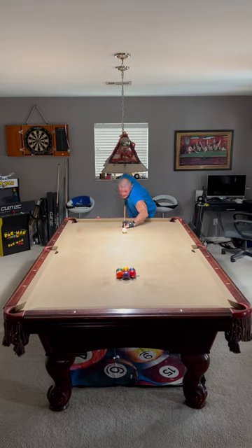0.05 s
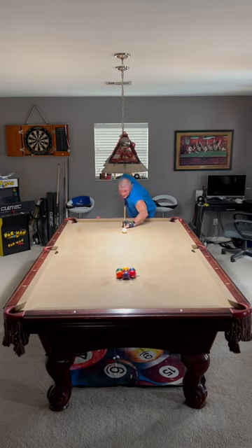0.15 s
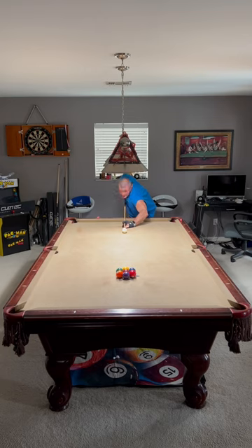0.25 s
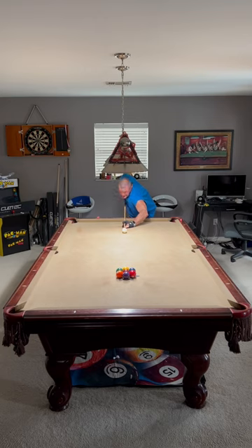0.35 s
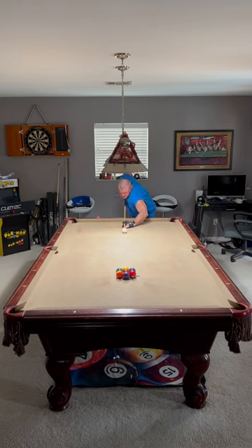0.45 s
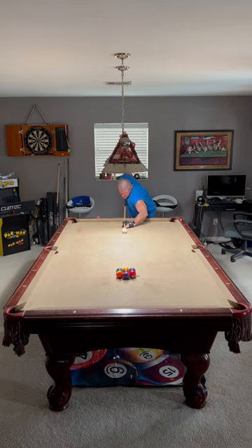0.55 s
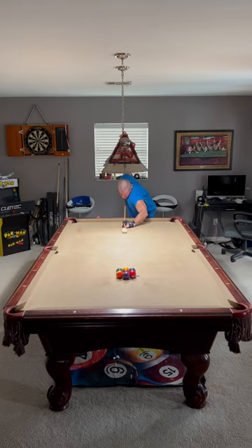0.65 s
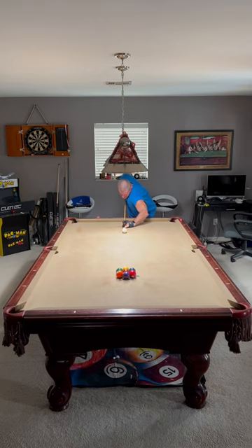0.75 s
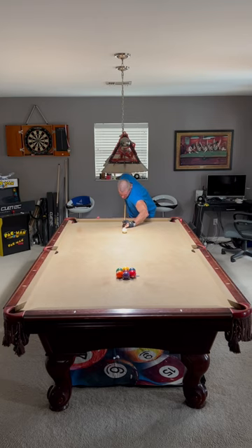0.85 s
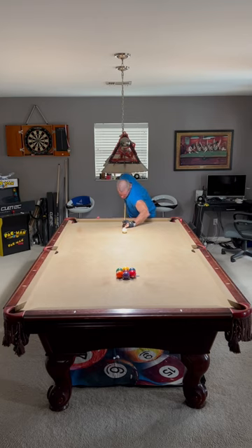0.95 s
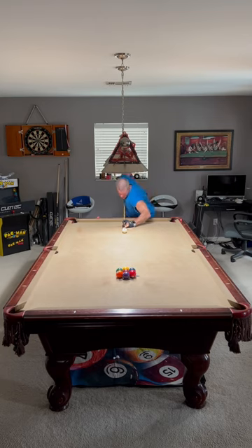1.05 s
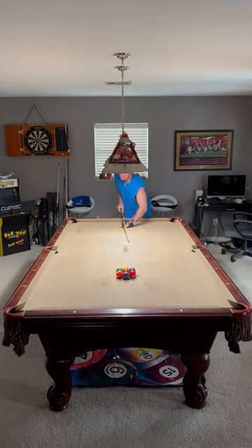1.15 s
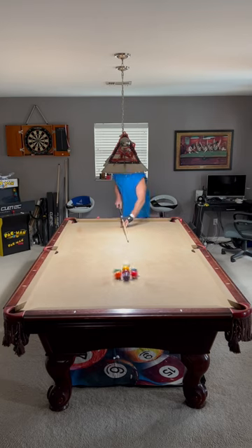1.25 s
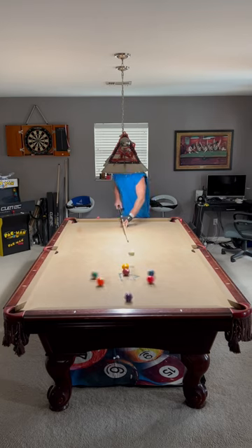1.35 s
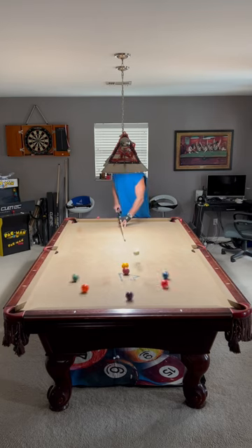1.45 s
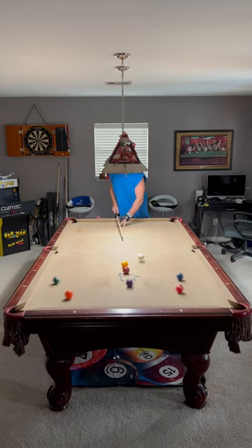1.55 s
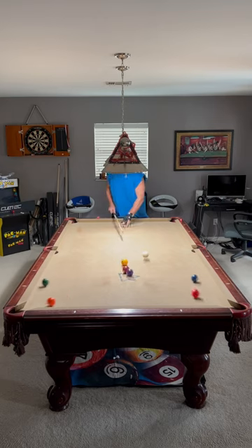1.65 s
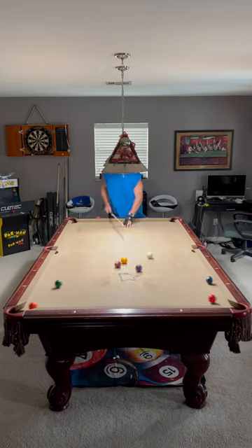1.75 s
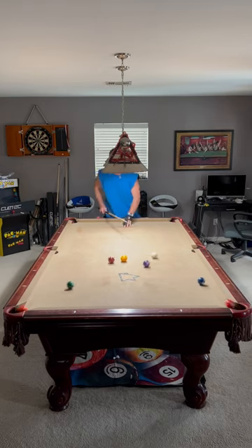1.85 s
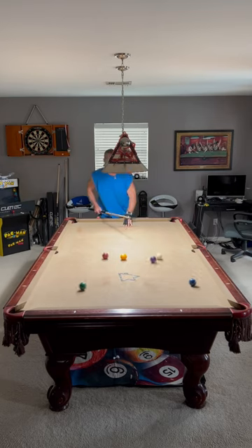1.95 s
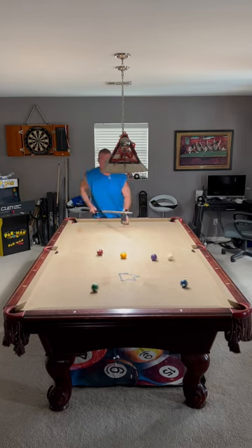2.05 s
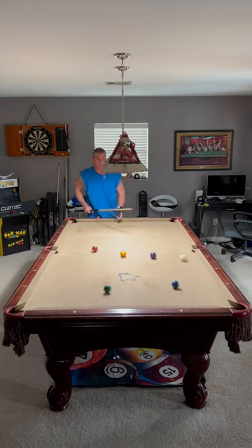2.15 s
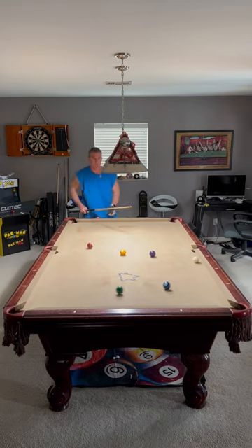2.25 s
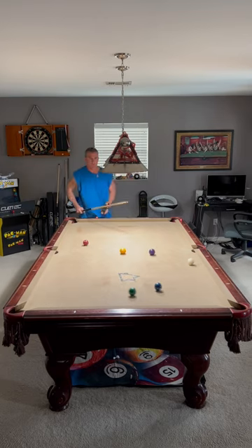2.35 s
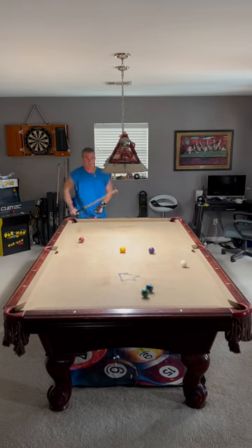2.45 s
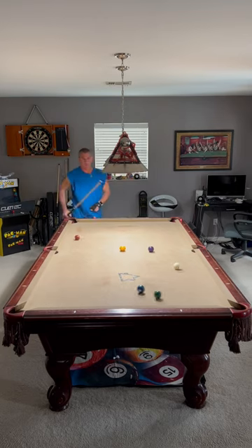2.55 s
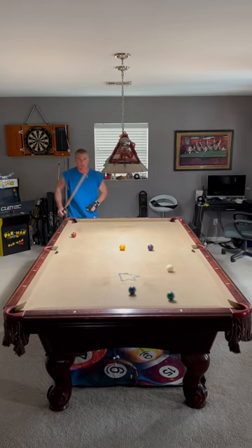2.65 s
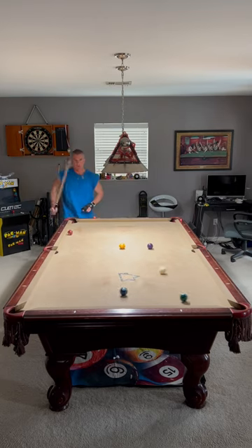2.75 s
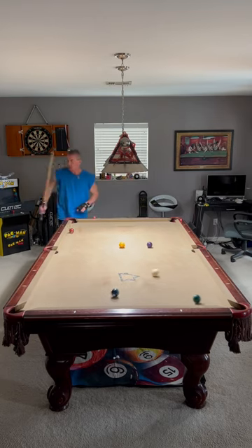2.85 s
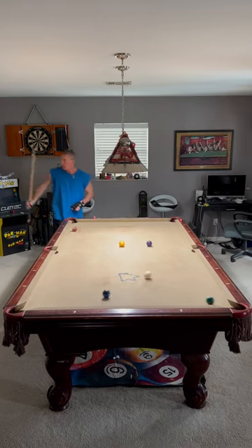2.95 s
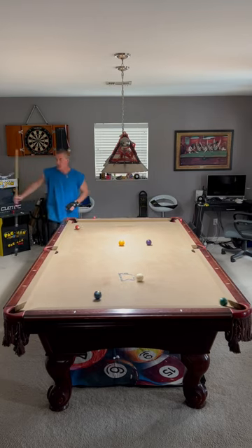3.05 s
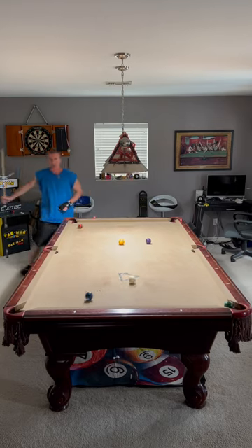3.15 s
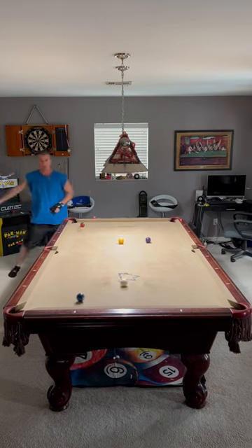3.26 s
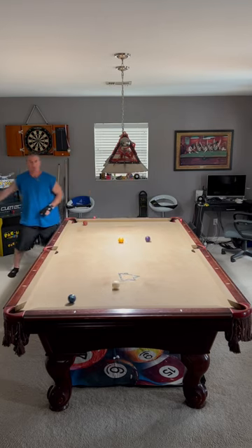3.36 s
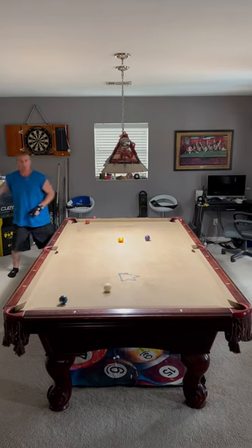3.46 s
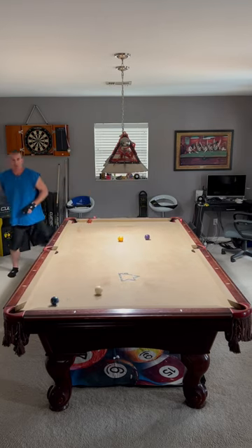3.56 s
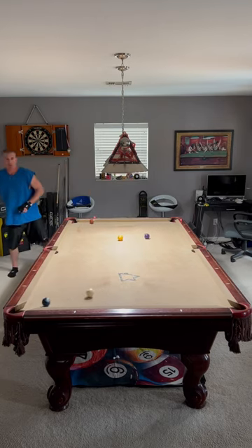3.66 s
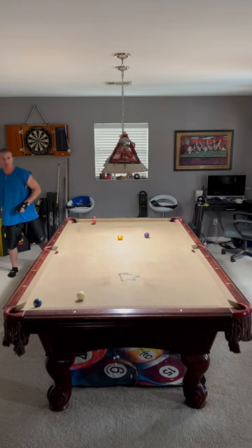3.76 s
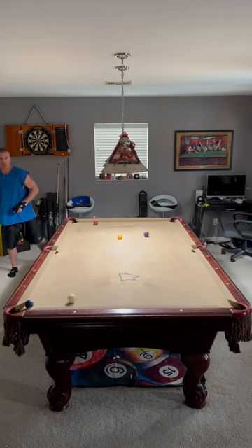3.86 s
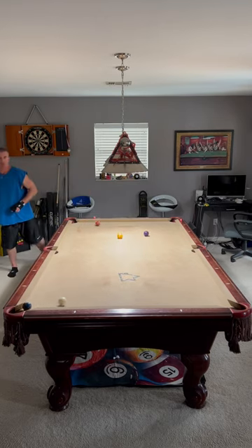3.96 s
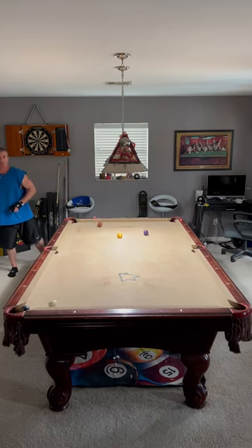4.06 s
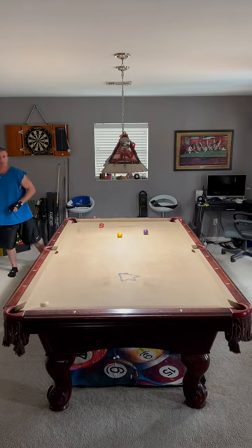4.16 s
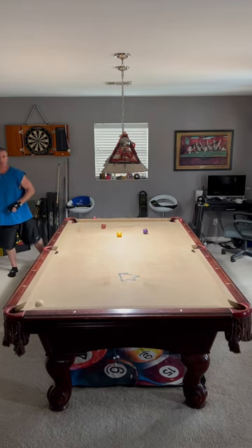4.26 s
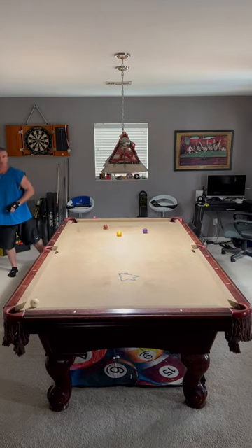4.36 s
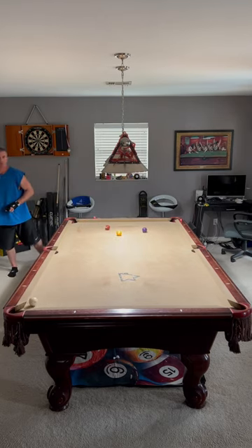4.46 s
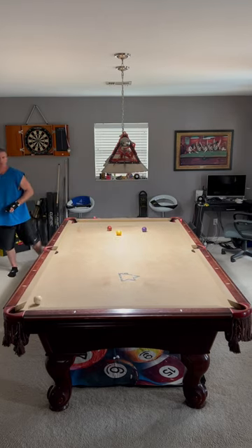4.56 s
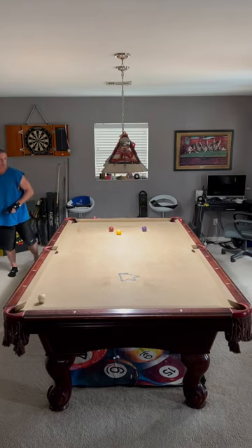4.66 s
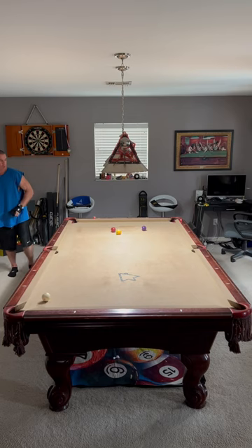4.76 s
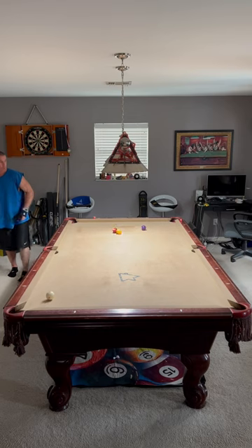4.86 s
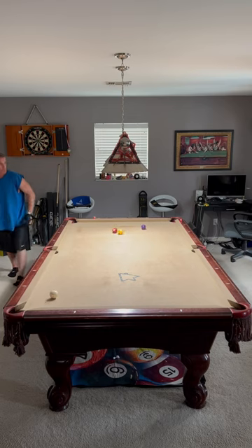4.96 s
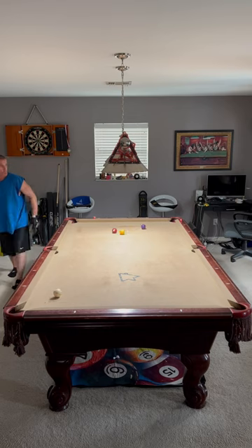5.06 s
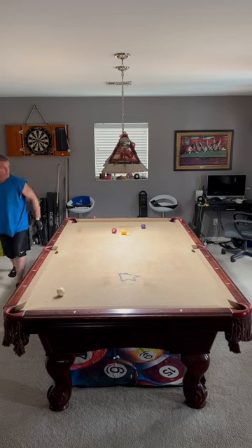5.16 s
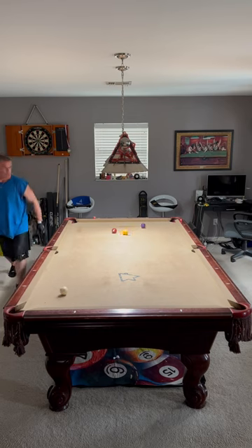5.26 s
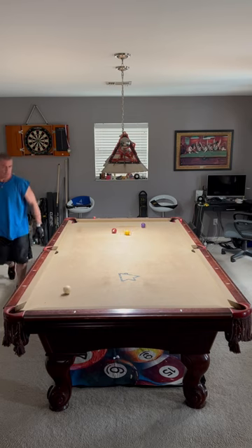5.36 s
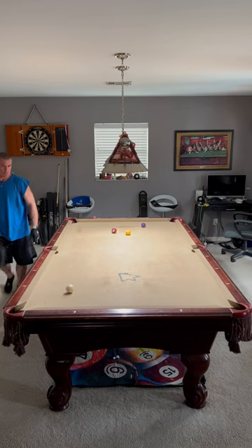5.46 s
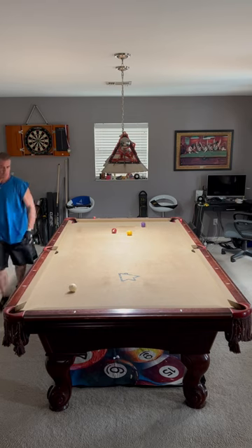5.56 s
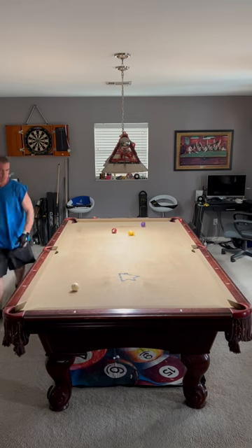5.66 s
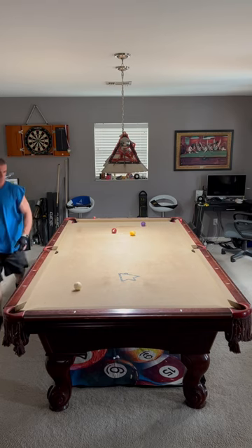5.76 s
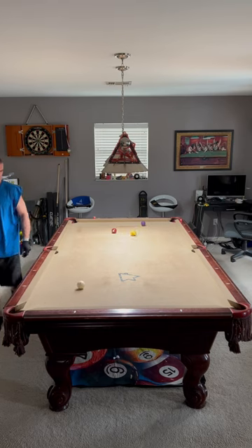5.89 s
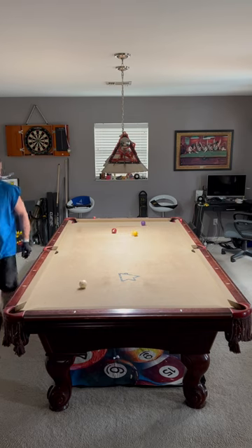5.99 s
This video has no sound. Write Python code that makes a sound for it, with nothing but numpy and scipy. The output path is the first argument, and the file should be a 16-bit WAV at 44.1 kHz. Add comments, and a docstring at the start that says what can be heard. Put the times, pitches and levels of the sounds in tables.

```python
"""A break shot on a slate pool table in a carpeted game room, heard from the foot of the table:
pulses of a few cycles make the cue's knock, the hard clacks and the thuds of cushions and pockets.
Random grains make the shaft's crackle and a ball tumbling into a pocket net; shaped noise makes
the low rumble with footfalls, the mid-range rush, the rustle, a faint hiss and the house rumble.
Noise that decays band by band rings after the blows, and a limiter holds the loudest peaks."""
import sys
import numpy as np
from scipy import signal
from scipy.fft import rfft, irfft
from scipy.io import wavfile
from scipy.ndimage import uniform_filter1d, minimum_filter1d

SR = 44100
rng = np.random.default_rng(int(sys.argv[2]) if len(sys.argv) > 2 else 0)


def unload_wav(signal):
    """Save mono or channel-first audio to the path in sys.argv[1] as 16-bit WAV at rate SR, clipped to [-1, 1]."""
    wavfile.write(
        sys.argv[1],
        SR,
        np.round(np.clip(np.atleast_2d(signal).T, -1, 1) * 32767).astype(np.int16),
    )


N = 265878
T = np.arange(N) / SR


def amp(db):
    """Level law: decibels to amplitude gain."""
    return 10 ** (np.asarray(db) / 20)


def rms_one(x):
    """Power normalisation: scale to rms 1."""
    return x / np.sqrt(np.mean(x ** 2) + 1e-20)


def in_time(rows):
    """Level envelopes: interpolate each column in time, -200 dB outside the table's span."""
    s, *columns = np.transpose(rows)
    return [np.interp(T, s, column, -200, -200) for column in columns]


def at_hz(points, hz):
    """Logarithmic frequency scale: interpolate a table along log f."""
    table_hz, values = np.array(points).T
    return np.interp(np.log(hz), np.log(table_hz), values)


def colour(x, spectrum):
    """Spectral filtering: weight each frequency by a gain curve in dB."""
    n = x.shape[-1]
    hz = np.arange(n // 2 + 1) * SR / n + 1   # 1 Hz up, to keep the logarithm finite
    return irfft(rfft(x) * amp(at_hz(spectrum, hz)), n)


# likeness of left and right in diffuse noise: (f/Hz, correlation)
NOISE_LIKENESS = [(60, 1), (250, 0.73), (600, .3), (1200, 0.01), (8000, 0.01), (13000, 0.17)]


def stereo_noise(size, likeness=NOISE_LIKENESS):
    """Interaural coherence: white noise whose left-right correlation follows frequency."""
    mid, side = rfft(rng.standard_normal((2, size)))
    alike = np.clip(at_hz(likeness, np.arange(len(mid)) * SR / size + 1), -1, 1)
    return irfft(np.sqrt(1 + alike) * mid + np.sqrt(1 - alike) * side * [[1], [-1]], size)


def sides(pan_db):
    """Level difference panning: left and right gains, left louder if positive."""
    return amp(np.array([[pan_db / 2], [-pan_db / 2]]))


def pulse(hz, cycles):
    """Impulsive radiation: a sudden push gives a few cycles that swell fast and die; peak 1."""
    turns = np.arange(int(4 * cycles * SR / hz)) * hz / SR
    swing = np.sin(2 * np.pi * turns) * turns ** 2 * np.exp(-6 * turns / cycles)
    window = np.hanning(len(turns))
    swing -= swing.sum() * window / window.sum()   # no net push
    return swing / np.abs(swing).max()


def add(track, s, sound):
    """Superposition: sum a sound into a track at a time in seconds."""
    i = round(s * SR)
    track[..., i:i + sound.shape[-1]] += sound[..., :track.shape[-1] - i]


def scatter(noise, decay_ms):
    """Diffuse scattering: a first arrival and a few ms of dying noise, unit energy."""
    t_ms = np.arange(len(noise)) * 1000 / SR
    spread = noise * np.exp(-t_ms / max(decay_ms, .02)) * 0.2
    spread[0] = 1
    return spread / np.sqrt(np.sum(spread ** 2))


def swell(s, attack_s, hold_s, release_db_per_s):
    """Exponential decay: gain rises as a square, holds, then falls evenly in dB."""
    rise = np.clip((T - s) / max(attack_s, .001), 0, 1)
    return rise ** 2 * amp(-release_db_per_s * np.maximum(T - s - attack_s - hold_s, 0))


def grains(per_s, spread_db):
    """Poisson-like impacts: random clicks of uneven size and sign, rms 1."""
    sizes = amp(spread_db * np.minimum(rng.exponential(1, N), 4)) * rng.choice([-1, 1], N)
    return rms_one(sizes * (rng.random(N) < per_s / SR))


# early echoes from table, ceiling and wall: (left t/ms, right t/ms, level/dB, smear/ms)
ROOM_ECHOES = [(1.5, 2.4, -6.5, 2.2), (7.8, 9.4, -10, 1.8), (15.2, 14.8, -11, 1.5)]
# late reverberation time: (f/Hz, t60/s)
ROOM_DECAY = [(100, .5), (260, 0.75), (700, 0.61), (1840, 0.58), (4850, .55), (12800, .45), (15500, 0.75)]
# likeness of left and right in the tail: (f/Hz, correlation)
TAIL_LIKENESS = [(60, 0.89), (250, -0.22), (500, .5), (1000, 0.32), (2000, 0.056), (4000, 0.36),
                 (8000, -0.49), (13000, 0.69)]
ROOM_DB, ROOM_FILLS_S = -29, .014
EARLY_DB, EARLY_T60_S = 7.5, 0.091   # an added faster decay, relative to the late tail


def room():
    """Reverberation: discrete echoes, then a tail that fills in and dies band by band, faster at first."""
    size = SR
    t, out = np.arange(size) / SR, np.zeros((2, size))
    noise = stereo_noise(size, TAIL_LIKENESS)
    edges = 40 * 2 ** np.arange(0, 9.1, .5)   # half octaves
    for low, high in zip(edges, edges[1:]):
        band = signal.sosfilt(signal.butter(2, [low, high], "band", fs=SR, output="sos"), noise)
        out += band * amp(-60 * t / at_hz(ROOM_DECAY, np.sqrt(low * high)))
    fill = 1 - np.exp(-(t / ROOM_FILLS_S) ** 2)
    early = 1 + amp(EARLY_DB - 60 * t / EARLY_T60_S)
    out *= amp(ROOM_DB) * fill * early
    for left_ms, right_ms, level_db, smear_ms in ROOM_ECHOES:
        scattered = amp(level_db) * scatter(rng.standard_normal(1024), smear_ms)   # furniture breaks each echo up
        add(out[0], left_ms / 1000, scattered)
        add(out[1], right_ms / 1000, scattered)
    return out


def heard(dry, wet):
    """Convolution: direct sound plus the room's answer to the wet signal."""
    return dry + signal.fftconvolve(wet[None], room(), axes=1)[:, :N]


FLIGHT_S = .0008   # delay of the direct sound
BED_DB = -28.5   # low pulse of the bed under the ball, relative to the blow
# the far wall sends each blow back lower and smeared, and the treble of clacks duller
WALL_PITCH, WALL_TREBLE_DB, WALL_SCATTER_MS = 0.85, -5, 3.1
WALL_SPREAD = 1.1   # strength of the smear against the first return
EDGE_MS, EDGE_SPREAD = 4.0, 6.0   # break-up of the treble that feeds the room
TABLE_PAN_DB = 0.5


def blows(rows, scatter_ms, first, second, airborne):
    """Impact and reflection: a pulse, its far-wall return, and two treble ticks or low swings per row."""
    dry, wet = np.zeros((2, N)), np.zeros(N)
    noise = rng.standard_normal((len(rows), 5, 2048))
    for row, draw in zip(rows, noise):
        s, peak_db, hz, cycles, first_db, second_db, room_db, wall_ms, wall_db = row
        s += FLIGHT_S
        parts = amp(first_db) * first + amp(second_db) * second
        # treble reaches the room broken up
        splash = scatter(EDGE_SPREAD * draw[4, :1024], EDGE_MS) if airborne else [1]
        direct = (s, 0, 0, hz, scatter_ms, draw[:2])
        far_wall = (s + wall_ms / 1000, wall_db, WALL_TREBLE_DB, hz * WALL_PITCH,
                    WALL_SCATTER_MS, WALL_SPREAD * draw[2:4])
        for at, level_db, dull_db, pitch_hz, smear_ms, (shared, own) in (direct, far_wall):
            body = amp(BED_DB) * pulse(pitch_hz * .45, cycles)   # the bed answers lower
            add(body, 0, pulse(pitch_hz, cycles))
            apart = min(pitch_hz / 900, 1)   # balls and rails scatter short waves differently to each side
            paths = [scatter((shared + sign * apart * own) / np.hypot(1, apart), smear_ms)
                     for sign in (1, -1)]
            arrival = np.array([np.convolve(body, path) for path in paths])
            add(dry, at, amp(peak_db + level_db) * arrival)
            if airborne:
                treble = signal.fftconvolve(parts, paths[0])
                add(dry, at, amp(peak_db + level_db + dull_db) * treble)
        if not airborne:
            add(dry, s, amp(peak_db) * parts)
        room_gain = amp(peak_db + room_db)
        add(wet, s, room_gain * pulse(hz, cycles))
        add(wet, s, room_gain * amp(BED_DB) * pulse(hz * 0.41, cycles))
        add(wet, s, room_gain * signal.fftconvolve(parts, splash))
    return heard(dry * sides(TABLE_PAN_DB), wet)


# spectrum of the rumble below the room: (f/Hz, relative level/dB)
HOUSE_SPECTRUM = [(15, -54.5), (25, -24), (41, -8.5), (64, 11.5), (87, -15), (127, -10.5), (206, -33),
                  (242, -14), (427, -39.5), (503, -35.5), (624, -55.5), (863, -44), (16000, -77)]


def house():
    """Stationary noise: a steady rumble with a fixed spectrum."""
    return amp(-58.5) * rms_one(colour(stereo_noise(N), HOUSE_SPECTRUM))


# low rumble and mid-range rush: rolling balls after the break, faint rustle and thuds elsewhere:
# (t/s, rumble level/dB, rush level/dB)
RUMBLE_AND_RUSH = [(0.0, -60, -81), (0.48, -59.5, -76.5), (0.8, -61.5, -76.5), (1.06, -55, -77),
                   (1.12, -57, -40), (1.24, -35.5, -33), (1.55, -55, -32.5), (1.9, -44, -41),
                   (2.03, -45, -66), (2.3, -53, -49), (2.87, -54, -83.5), (3.35, -57.5, -64),
                   (3.45, -53.5, -55.5), (3.9, -60, -73), (4.06, -55, -57.5), (4.5, -57, -61),
                   (4.65, -62.5, -79.5), (4.95, -55, -72.5), (5.34, -60, -81), (6.03, -61, -69)]
# footfalls that swell the rumble: (t/s, level/dB)
FOOTFALLS = [(1.491, -37), (1.69, -40), (1.99, -57), (2.41, -51.5), (3.4, -45), (4.16, -56.5)]
# spectrum of the rumble: (f/Hz, relative level/dB per Hz)
RUMBLE_SPECTRUM = [(25, -44.5), (45, -23), (80, 1.5), (130, -2.5), (250, -15), (500, -27.5), (900, -45)]
STEP_ATTACK_S, STEP_RELEASE_DB_PER_S = 0.022, 145.5


def rumble():
    """Incoherent power sum: the rumble envelope and footfalls add their powers in one low noise."""
    rumble_db, _ = in_time(RUMBLE_AND_RUSH)
    steps = sum(amp(level_db) * swell(s, STEP_ATTACK_S, 0, STEP_RELEASE_DB_PER_S)
                for s, level_db in FOOTFALLS)
    return np.hypot(amp(rumble_db), steps) * rms_one(colour(stereo_noise(N), RUMBLE_SPECTRUM))


# spectrum of the mid-range rush: (f/Hz, relative level/dB per Hz)
RUSH_SPECTRUM = [(40, -61.5), (120, -14.5), (250, -5), (500, -14), (1000, -12), (2000, -14), (4000, -55)]


def rush():
    """Amplitude modulation: a mid-range rush of shaped noise under a level envelope."""
    _, rush_db = in_time(RUMBLE_AND_RUSH)
    return amp(rush_db) * rms_one(colour(stereo_noise(N), RUSH_SPECTRUM))


# rubs of clothing and hands: (t/s, hold/s, level/dB, bright part relative level/dB)
RUB_EVENTS = [(0.327, 0.012, -68.5, -20), (0.449, 0.017, -67, -10.5), (0.7, .06, -97, -15),
              (0.88, 0.29, -85.5, -11.5), (2.502, 0.25, -71, -2), (2.8, 0.18, -75.5, -23),
              (3.07, .02, -75.5, -27), (3.204, 0.18, -78.5, 9.5), (4.686, .05, -75, -10),
              (4.966, 0.047, -79, 3.5), (5.281, 0.12, -77.5, -14), (5.451, 0.28, -68.5, -5.5),
              (5.81, 0.044, -72, -3), (5.987, .04, -68, -16.5)]
# spectrum of the duller part: (f/Hz, relative level/dB per Hz)
RUSTLE_DULL = [(290, -37), (500, 2.5), (1110, 5.5), (1490, 8), (1630, 5), (2070, -4), (2530, -0.5),
               (3400, -26), (4420, -51), (7480, -120)]
# spectrum of the brighter part: (f/Hz, relative level/dB)
RUSTLE_BRIGHT = [(2000, -26.5), (3400, -3), (4890, -5), (8590, -13.5), (10200, -17), (11400, -12.5),
                 (13200, -14.5), (14900, -34.5), (16000, -33)]
RUB_ATTACK_S, RUB_RELEASE_DB_PER_S = 0.045, 143


def rustle():
    """Friction noise: clothing and hands rub in a duller and a brighter part."""
    dull = rms_one(colour(stereo_noise(N), RUSTLE_DULL))
    bright = rms_one(colour(stereo_noise(N), RUSTLE_BRIGHT))
    out = 0
    for s, hold_s, level_db, treble_db in RUB_EVENTS:
        gain = amp(level_db) * swell(s, RUB_ATTACK_S, hold_s, RUB_RELEASE_DB_PER_S)
        out = out + gain * (dull + amp(treble_db) * bright)
    return out


# crackle of the cue shaft: (t/s, body level/dB, treble and top treble level/dB relative to body)
SHAFT_CRACKLE = [(1.067, -24.5, -20, -10.5), (1.089, -19.5, -3, -20), (1.139, -37.5, -4, -22.5),
                 (1.24, -37.5, -14.5, -32.5)]
# treble of hard contact: (f/Hz, relative level/dB)
CONTACT_TREBLE = [(2000, -27.5), (3300, -12.5), (4950, -5), (6100, -1.5), (7400, -9), (9000, -14.5),
                  (10500, -34.5)]
# top treble, the sharpest edge of hard contact: (f/Hz, relative level/dB)
CONTACT_TOP = [(9000, -18.5), (11300, -2), (12500, -8.5), (15000, -4.5), (16500, -19.5)]


def stroke():
    """Granular excitation: dense crackle of tip and shaft in body and treble."""
    body_db, treble_db, top_db = in_time(SHAFT_CRACKLE)
    clicks = grains(per_s=2400, spread_db=3.0)
    body = rms_one(np.convolve(clicks, pulse(hz=2500, cycles=2.1))[:N])
    treble = amp(treble_db) * rms_one(colour(clicks, CONTACT_TREBLE))
    top = amp(top_db) * rms_one(colour(clicks, CONTACT_TOP))
    dry = amp(body_db) * (body + treble + top)
    return heard(dry, dry * amp(-1.5))


def thump(hz, t60):
    """Damped resonance: the slate bed or frame gives a low decaying swing."""
    t = np.arange(8192) / SR
    return np.sin(2 * np.pi * hz * t) * amp(-60 * t / t60) * (1 - np.exp(-t / 0.0014))


# dull blows of cue tip, cushion and pocket: (t/s, pulse level/dB, f/Hz, nominal pulse length/cycles,
# slate and frame relative level/dB, room feed relative level/dB, far wall delay/ms, far wall level/dB)
DULL_BLOWS = [(1.067, -0.5, 800, 1.29, -23.5, -21.5, 4, 24, -0.5),
              (1.076, -3.5, 299, 2.95, -38, -24, -7, 22, -5),
              (1.105, -6.5, 625, 1.5, -35, -30, -5, 28, -3.5), (1.209, -3, 810, 1.6, -37, -32, 0.5, 23, 0),
              (1.38, -22, 386, 2.1, -29, -14, -13, 20, -12),
              (1.455, -20.5, 422, 2.4, -38, -8.5, 0, 24.5, -8),
              (1.54, -2.5, 915, 1.53, -27, -18, 3, 22, -4),
              (1.556, -15, 369, 4.1, -20, -33.5, -11, 31, -3.5),
              (1.693, -9, 648, 1.48, -38, -16, 5.5, 20.7, -5),
              (1.774, -11.5, 770, 1.9, -33, -25, 1.5, 26, -9),
              (1.836, -15.5, 436, 1.4, -18, -22, -11.5, 27, -5),
              (2.305, -28, 540, 1.35, -18.5, -9.5, 1, 20, -6),
              (3.087, -45.5, 515, 0.79, 0.5, -2, 5, 29, -16), (3.409, -35.5, 1094, 2.3, 7, 2, -12, 22, -13),
              (3.599, -42.5, 322, 1.14, 4, 5, -11.5, 17, -13),
              (4.279, -35.5, 415, 0.67, 4, -16, -3, 14, -7),
              (4.867, -29, 1200, 1.08, -14, -27, 7.5, 26.4, -8.5),
              (5.04, -44, 305, 1.06, -19.5, -19.5, -3.5, 15, -4)]


def thuds():
    """Soft impact: dull blows give low pulses and swings of slate and frame."""
    slate, frame = thump(hz=79, t60=0.17), thump(hz=132.5, t60=0.091)
    return blows(DULL_BLOWS, 2.5, slate, frame, airborne=False)   # scatter 2.5 ms


def tick(spectrum, level_db):
    """Hard contact: a filtered impulse of set energy gives the sharp edge."""
    impulse = np.eye(1, 4096, 60)[0]
    click = colour(impulse, spectrum)
    return click / np.sqrt(np.sum(click ** 2)) * amp(level_db)


# hard clacks: balls meeting, balls dropping into pockets, bright bouncing rattles:
# (t/s, pulse level/dB, f/Hz, nominal pulse length/cycles, gain on treble tick/dB,
# gain on top tick/dB, room feed relative level/dB, far wall delay/ms, far wall level/dB)
HARD_CLACKS = [(1.2531, 11, 2250, 2, -40.5, -40, -2.5, 23, -1),
               (1.544, -11.5, 1935, 1.9, -42.5, -65.5, 13, 19.6, 3.5),
               (1.6719, -6, 2140, 2.04, -55, -34.5, 1, 25, -2),
               (1.9989, -13, 2210, 1.67, -50, -27, 3, 16, -4),
               (2.0199, -21.5, 2220, 1.38, -13.5, -35, 12, 26, -1.5),
               (2.1537, -17.5, 2090, 1.8, -14.5, -12.5, 4.5, 5.5, -5),
               (2.2421, -20.5, 3140, 2.04, -10.5, -71, 5.5, 29, -6.5),
               (2.3761, -28, 3130, 2.4, -17, -35, 7, 21, -12),
               (2.45, -39.5, 2560, 1.4, -15, -27, 7, 25, -12),
               (2.5845, -56, 2500, 1.5, -1, -26, 1, 32, -4.5),
               (2.6264, -57.5, 2524, 1.8, -3, -12, 10.5, 38, -1.5),
               (2.7392, -63, 2240, 1.8, 2, -18, 0, 21, -6),
               (3.3205, -19.5, 2110, 1.63, -14, -18, 12.5, 15.8, -4.5),
               (3.3245, -21, 2200, 1.64, -19.5, -26.5, -8, 31, 6.5),
               (3.4377, -23, 1987, 1.57, -21.5, -38, 6.5, 21, -19),
               (4.2058, -22.5, 2640, 1.4, -26.5, -36, -10, 39, -1.5),
               (4.2083, -19, 2100, 1.28, -26, -34.5, 11, 21, -9),
               (4.309, -30, 2130, 1.4, -32, -42, 9, 19, -1),
               (4.3927, -35.5, 2060, 1.21, -31, -39.5, 3.5, 24, -8),
               (4.8666, -18, 2056, 2.66, -42, -35.5, 2, 17.6, -2.5),
               (5.8244, -54.5, 2356, 2.5, -8.5, -13, 2.5, 26.5, -7)]


def clacks():
    """Hard impact: short contacts give pulses with treble edges."""
    treble, top = tick(CONTACT_TREBLE, level_db=18.0), tick(CONTACT_TOP, level_db=12.5)
    return blows(HARD_CLACKS, 0.29, treble, top, airborne=True)   # scatter 0.29 ms


# a ball tumbles down into a pocket net: (t/s, level/dB)
TUMBLE_LEVELS = [(3.856, -78), (3.86, -62), (3.93, -54), (3.955, -61), (4.072, -89), (4.19, -103)]
# modes of pocket and frame: (f/Hz, level/dB, t60/s, held to 0.045 at most in play)
POCKET_MODES = [(264, -1.5, 0.033), (384, -16, 0.036), (550, -23, 0.14), (795, -5.5, 0.052),
                (943, -4, 0.032), (1217, -3, 0.02), (1450, -1.5, 0.011), (1768, -10.5, .06),
                (2060, -15, 0.009), (2400, -11, 0.012)]
# rattle of the net: (f/Hz, relative level/dB)
NET_RATTLE = [(1500, -30), (2800, -0.5), (4200, 6), (6000, 1.5), (9000, -13), (13000, -35)]
TUMBLE_TREBLE_DB = 6


def tumble():
    """Modal excitation: many small knocks drive the damped modes of pocket and frame."""
    level_db, = in_time(TUMBLE_LEVELS)
    clicks = grains(per_s=1600, spread_db=3.0) * amp(level_db)
    modes = 0
    for hz, mode_db, t60 in POCKET_MODES:
        radius, w = amp(-60 / (min(t60, .045) * SR)), 2 * np.pi * hz / SR
        feed = [0, amp(mode_db) * np.sin(w)]
        back = [1, -2 * radius * np.cos(w), radius * radius]
        modes = modes + signal.lfilter(feed, back, clicks + 1e-18)
    knocks = np.convolve(clicks, pulse(hz=388, cycles=1.05))[:N] * amp(3.0)
    # high-pass keeps the knocks light
    knocks = signal.sosfilt(signal.butter(3, 190, "high", fs=SR, output="sos"), knocks)
    rattle = colour(np.abs(clicks) * rng.choice([-1, 1], N), NET_RATTLE)
    dry = modes + knocks + amp(TUMBLE_TREBLE_DB) * rattle
    return heard(dry * sides(pan_db=6.0), dry * amp(1.5))


# faint hiss as the player moves: (f/Hz, width/Hz, level/dB)
WHISTLE_BANDS = [(2530, 236, -74), (4925, 350, -85.5)]
WHISTLE_S, WHISTLE_RISE_S = 5.45, 0.17


def whistle():
    """Narrow-band noise: two hissing bands fade in and stay."""
    bands = 0
    for hz, width_hz, level_db in WHISTLE_BANDS:
        edges = [hz - width_hz / 2, hz + width_hz / 2]
        sos = signal.butter(2, edges, "band", fs=SR, output="sos")
        bands = bands + amp(level_db) * rms_one(signal.sosfilt(sos, stereo_noise(N)))
    return swell(WHISTLE_S, WHISTLE_RISE_S, N / SR, 0) * bands


BASS_CUT_HZ = 92


def scene():
    """Superposition: all sources sum, some of them high-passed."""
    table = rush() + stroke() + thuds() + clacks() + tumble()
    # high-pass: the blows and the rush are kept thin in the deep bass
    table = signal.sosfilt(signal.butter(4, BASS_CUT_HZ, "high", fs=SR, output="sos"), table)
    return house() + rumble() + rustle() + table + whistle()


MID_NOTCH_HZ, MID_NOTCH_WIDTH_HZ = 10076, 1500
LIMIT_DB, RELEASE_DB_PER_S = -.7, 62.5
CUTOFF_HZ = 16700


def record(dry):
    """Filtering and limiting: a narrow treble band is notched out of the mid, peaks duck, the top is cut."""
    mid, side = (dry[0] + dry[1]) / 2, (dry[0] - dry[1]) / 2
    edges = [MID_NOTCH_HZ - MID_NOTCH_WIDTH_HZ / 2, MID_NOTCH_HZ + MID_NOTCH_WIDTH_HZ / 2]
    mid = signal.sosfilt(signal.cheby2(5, 40, edges, "bandstop", fs=SR, output="sos"), mid)
    x = np.array([mid + side, mid - side])
    peak_db = 20 * np.log10(np.abs(x).max(axis=0) + 1e-9)
    over_db = np.maximum(peak_db - LIMIT_DB, 0)
    held_db = np.maximum.accumulate(over_db + RELEASE_DB_PER_S * T) - RELEASE_DB_PER_S * T
    duck_db = uniform_filter1d(minimum_filter1d(-held_db, size=441), size=221)   # looks 5 ms ahead, smoothed
    return signal.sosfilt(signal.cheby2(12, 70, CUTOFF_HZ, fs=SR, output="sos"), x * amp(duck_db))


dry = scene()
out = record(dry)
unload_wav(out)
```